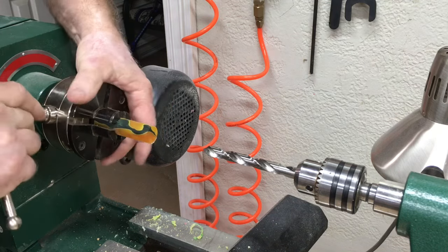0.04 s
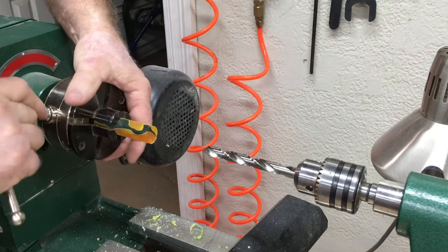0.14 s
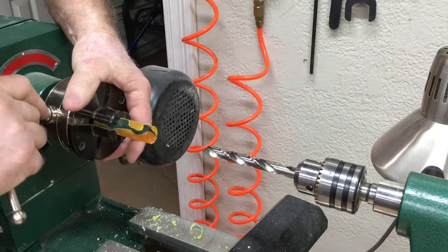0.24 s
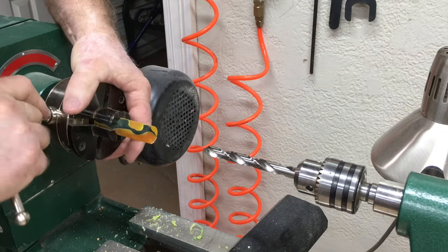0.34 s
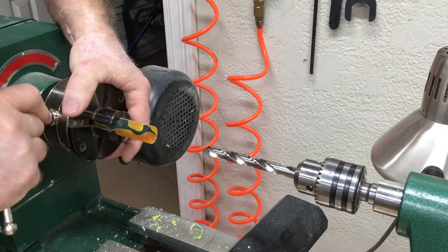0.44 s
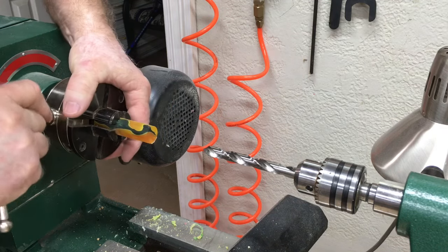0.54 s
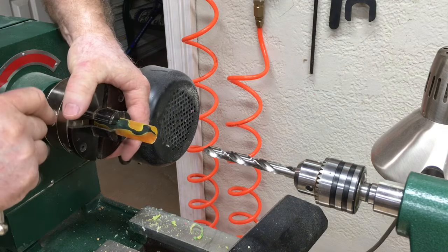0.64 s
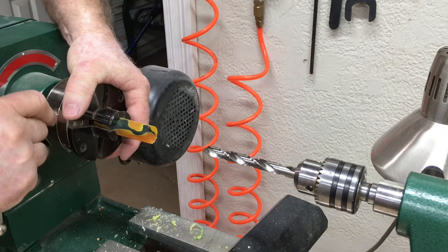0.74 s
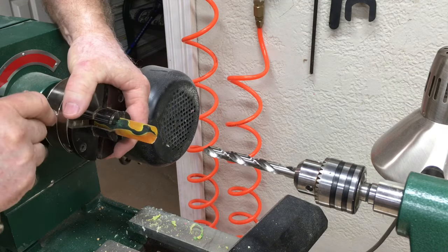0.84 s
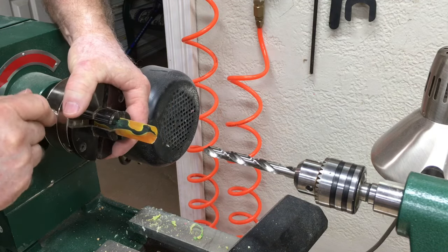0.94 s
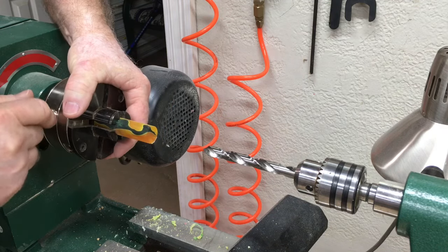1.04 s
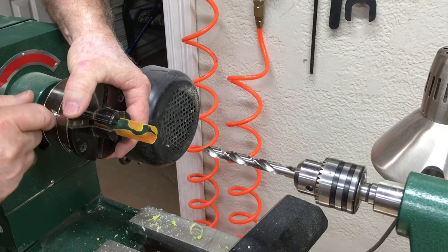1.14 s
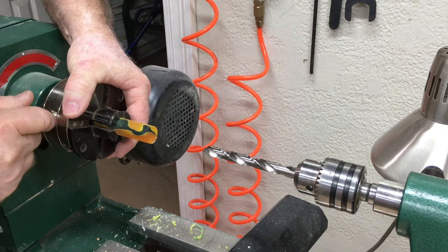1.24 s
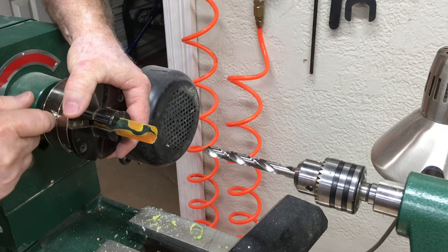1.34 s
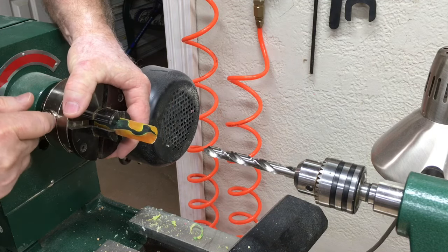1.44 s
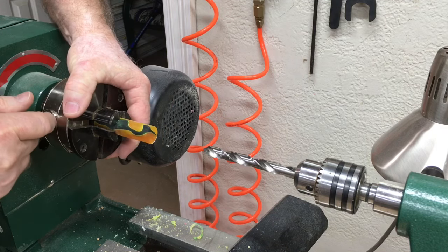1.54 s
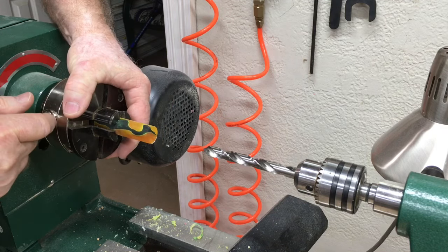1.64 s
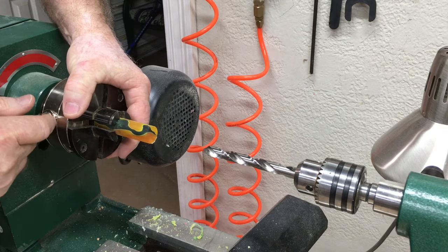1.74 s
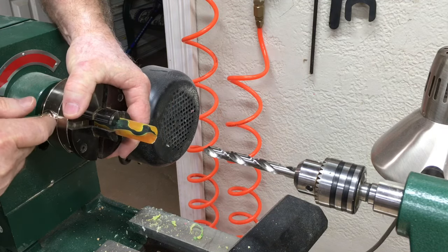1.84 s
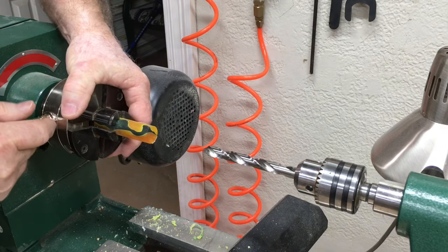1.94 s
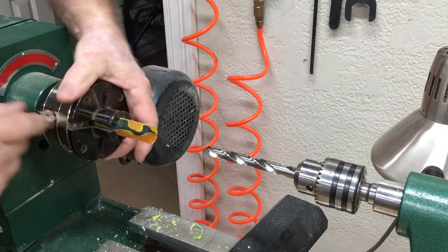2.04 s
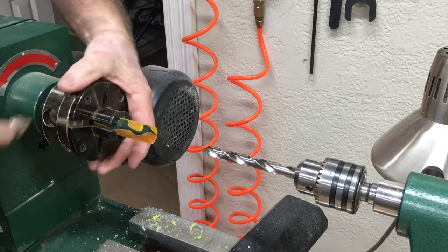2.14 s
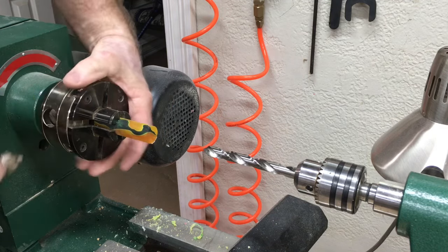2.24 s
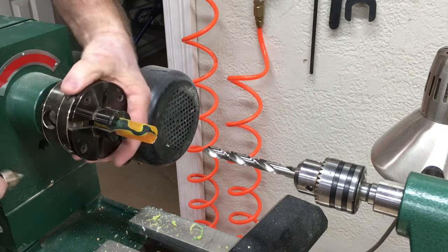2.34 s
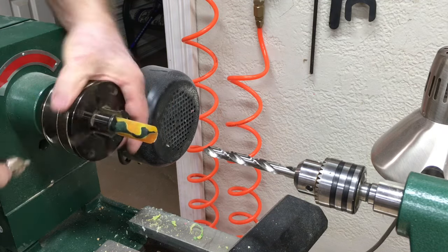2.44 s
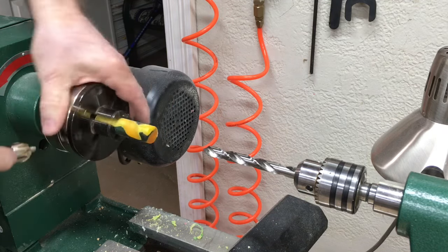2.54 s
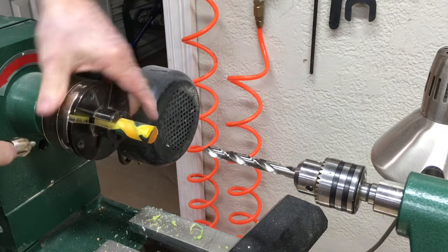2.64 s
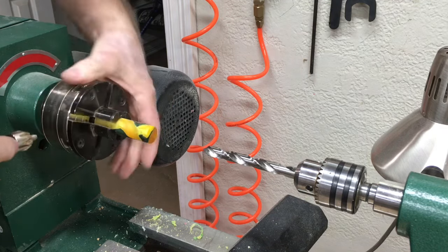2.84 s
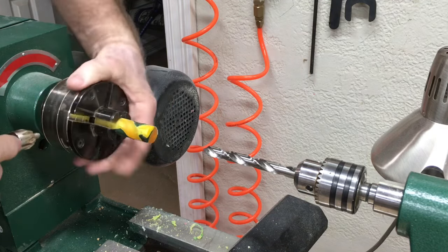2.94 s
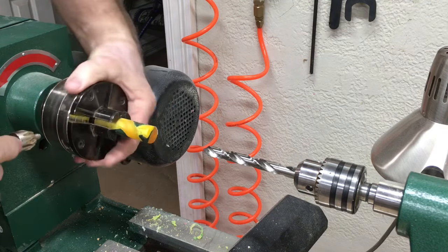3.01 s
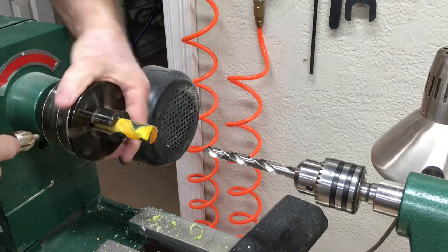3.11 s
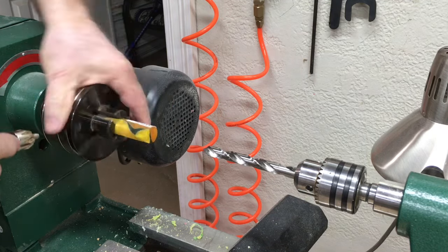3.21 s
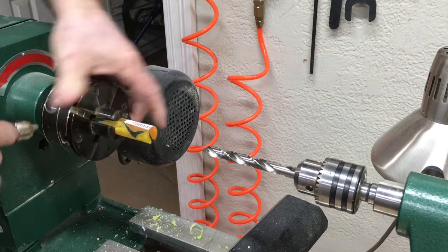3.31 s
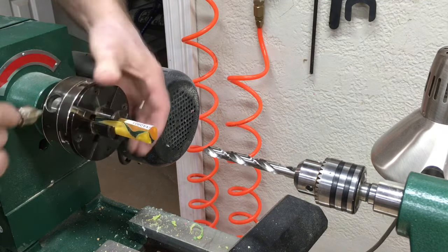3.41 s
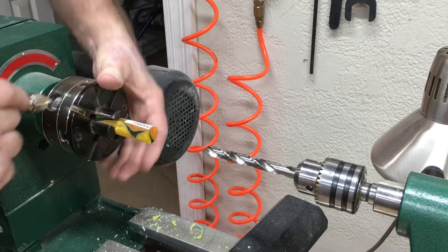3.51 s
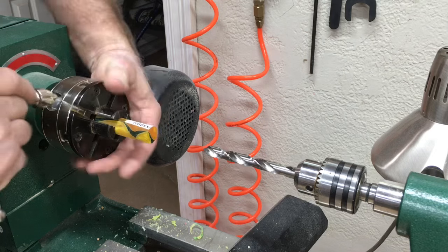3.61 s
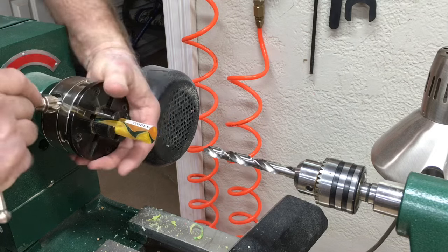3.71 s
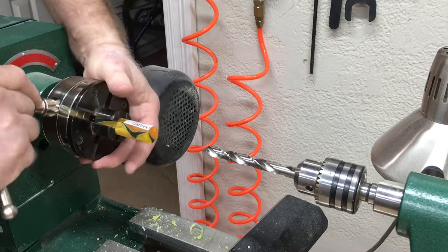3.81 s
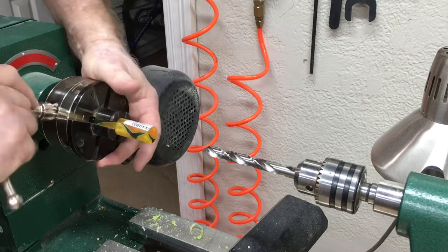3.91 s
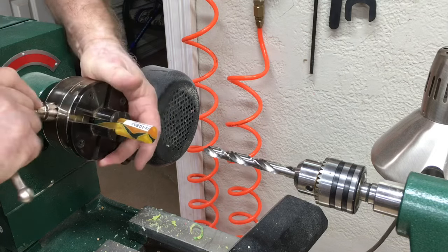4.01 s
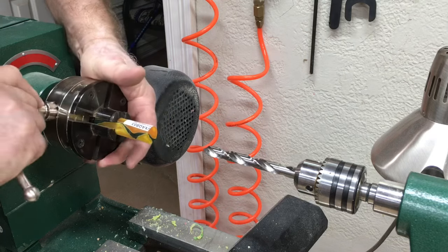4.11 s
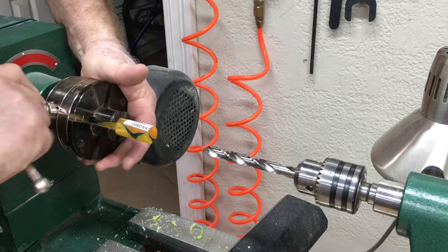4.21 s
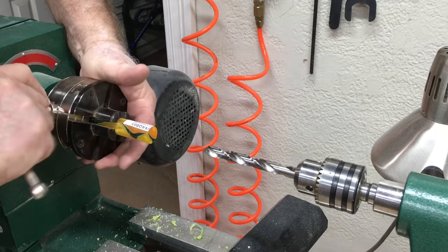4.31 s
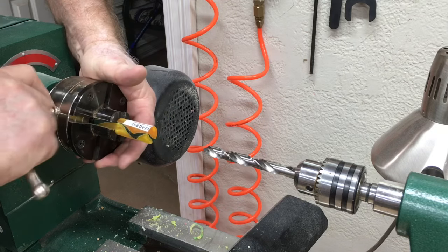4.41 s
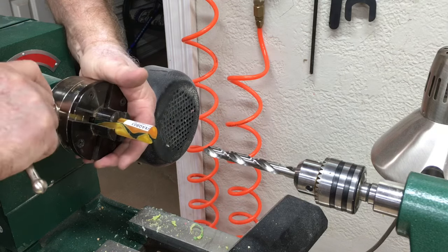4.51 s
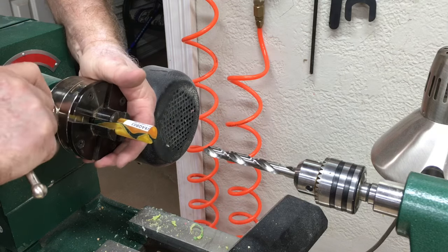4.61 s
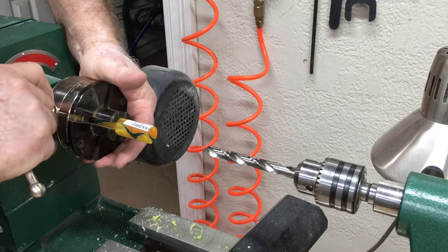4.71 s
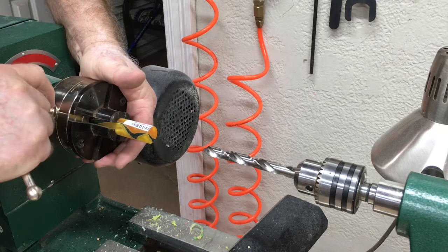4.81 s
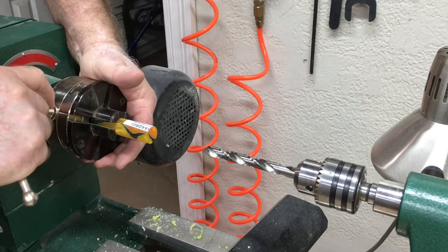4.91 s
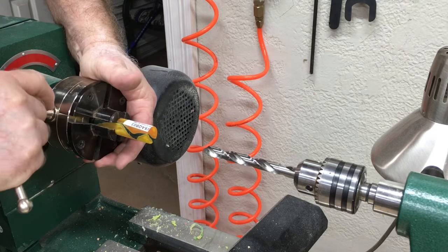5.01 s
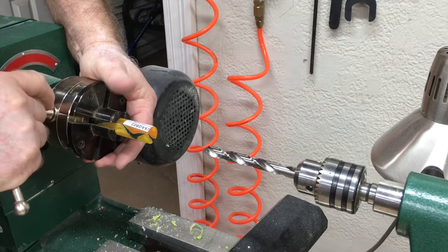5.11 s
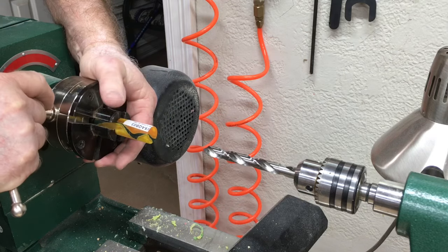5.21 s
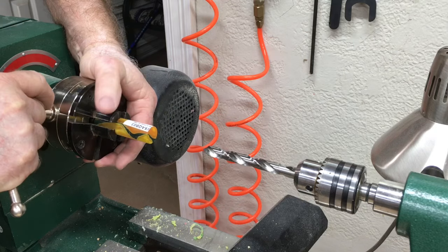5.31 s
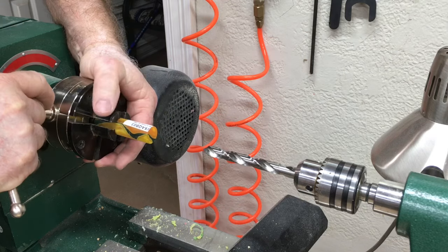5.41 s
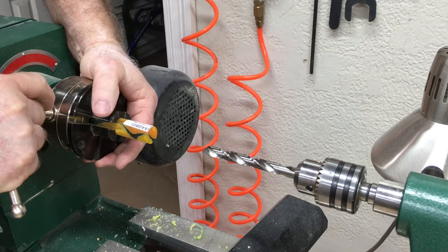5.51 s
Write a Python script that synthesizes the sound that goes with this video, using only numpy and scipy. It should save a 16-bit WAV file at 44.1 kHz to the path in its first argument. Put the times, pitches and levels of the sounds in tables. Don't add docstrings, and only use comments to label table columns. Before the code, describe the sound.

Close view of a hand-turned lathe chuck in a small quiet workshop. Hard steel knocks come first, then near-silence, a dense ratchety rattle at two seconds, hand rustles and bright key clinks, a single clack, a second softer chatter and a final hard knock. Faint motor hum, low rumble and microphone hiss lie underneath.

```python
import sys
import numpy as np
from scipy import signal
from scipy.fft import rfft, irfft
from scipy.io import wavfile
from scipy.ndimage import uniform_filter1d

SR = 44100
rng = np.random.default_rng(int(sys.argv[2]) if len(sys.argv) > 2 else 0)


def voltage_ratio(decibels):
    exponent = np.asarray(decibels, float) / 20
    return 10 ** exponent


def waveform_to_disk(signal):
    frames = np.transpose(np.atleast_2d(signal))
    scaled = np.clip(frames, -1, 1) * 32767
    samples = np.round(scaled).astype(np.int16)
    wavfile.write(sys.argv[1], SR, samples)


N = 244755
LEAD = 4410

# frequency in Hz, width in Hz, level in dB.
HEADSTOCK = [(162.6, 25, -10), (186, 16, -1.5), (248, 90, -5.5), (288.3, 14, -6), (350, 44, -1.5),
             (435, 35, -5.5), (495, 130, -5), (555, 34, -6.5), (642.9, 23, 0), (771.5, 130, -3),
             (830, 210, -2.5)]


def at_hz(points, hz, column=1):
    points = np.array(points)
    return np.interp(np.log(hz + 1), np.log(points[:, 0]), points[:, column])


def coloured(spectrum):
    gain = voltage_ratio(at_hz(spectrum, np.fft.rfftfreq(N, 1 / SR)))
    x = irfft(rfft(rng.standard_normal(N)) * gain, N)
    return x / x.std()


def band(x, low_hz, high_hz):
    return signal.sosfilt(signal.butter(2, [low_hz, high_hz], "band", fs=SR, output="sos"), x)


def ring(force, hz, t60):
    radius, angle = voltage_ratio(-60 / (t60 * SR)), 2 * np.pi * hz / SR
    poles = [1, -2 * radius * np.cos(angle), radius * radius]
    return signal.lfilter([0, np.sin(angle)], poles, force + 1e-18)


def resonances(force, peaks):
    out = 0
    for k, (hz, width_hz, peak_db) in enumerate(peaks):
        t60 = np.log(1000) / (np.pi * width_hz)
        level = (-1) ** k * voltage_ratio(peak_db) * np.sqrt(4 * np.pi * width_hz / SR)
        out = out + level * ring(force, hz, t60)
    return out


def struck(modes, hits):
    s, *levels_db = np.transpose(hits)
    out = 0
    for (hz, t60), level_db in zip(modes, levels_db):
        force = np.zeros(N + LEAD)
        force[(s * SR).astype(int) + LEAD] = voltage_ratio(level_db)
        out = out + ring(force, hz, t60)
    return out


def bursts(times, levels_db, late_s, rise_s, t60):
    marks = np.zeros(N + LEAD)
    np.add.at(marks, ((times + late_s) * SR).astype(int) + LEAD, voltage_ratio(levels_db))
    up, down = np.exp(-1 / (max(rise_s, 1e-4) * SR)), voltage_ratio(-60 / (t60 * SR))
    return signal.lfilter([1 - up], np.convolve([1, -up], [1, -down]), marks + 1e-18)


def swells(rows, column=3):
    t = np.arange(N) / SR
    edge_db = -21
    shape = []
    for peak_s, rise_s, fall_s, *_ in rows:
        corners_s = [peak_s - abs(rise_s), peak_s, peak_s + abs(fall_s)]
        shape.append(np.interp(t, corners_s, [edge_db, 0, edge_db], -99, -99))
    return np.array(shape) + np.array(rows)[:, [column]]


def grit(level_db, per_s, spread_db):
    strength = voltage_ratio(spread_db * np.minimum(rng.exponential(1, N), 4))
    slips = (rng.random(N) < per_s / SR) * strength
    slips = signal.lfilter([1], [1, -.975], slips)
    return voltage_ratio(level_db) * slips / np.sqrt(np.mean(slips ** 2))


def rumble_and_hiss():
    # frequency in Hz, density in dB per Hz.
    spectrum = [(12, -47.5), (20, -31), (60, 1), (102, -14), (117, -10.5), (139, -11), (169, -23.5),
                (206, -14.5), (273, -20), (342, -23.5), (506, -33), (599, -25), (1600, -37), (15200, -41),
                (16500, -53.5)]
    return voltage_ratio(-61) * coloured(spectrum)


def hum():
    # time in seconds, level in dB.
    line = [(0.0, -58.5), (0.6, -60), (1.33, -59.5), (2.29, -59.5), (2.83, -68), (3.1, -64), (4.101, -77),
            (4.55, -59.5), (4.75, -73), (5.55, -77)]
    wander_hz = uniform_filter1d(rng.standard_normal(N), size=6000) * 60
    phase = 2 * np.pi * np.cumsum(138 + wander_hz) / SR
    level_db = np.interp(np.arange(N) / SR, *np.transpose(line))
    return np.sqrt(2) * voltage_ratio(level_db) * np.sin(phase)


def workshop(x):
    # frequency in Hz, t60 in seconds, level in dB.
    room = [(100, 0.93, -11), (300, 0.41, -0.5), (1070, 0.3, -6.5), (2970, 0.22, -12.5), (8000, 0.19, -16),
            (15000, .18, -16.5)]
    far_walls_db = 21.5
    t, tail = np.arange(SR) / SR, 0
    for hz in 90 * 2. ** np.arange(0, 7.6, .5):
        noise = band(rng.standard_normal(len(t)), hz / 1.19, hz * 1.19)
        t60 = at_hz(room, hz)
        fall = voltage_ratio(-60 * t / t60) + voltage_ratio(-far_walls_db - 60 * t / (3 * t60))
        level = voltage_ratio(at_hz(room, hz, column=2)) / np.sqrt(t60 * SR / 14)
        tail = tail + noise * fall * level
    tail = tail * np.clip(t / .015, 0, 1)
    return signal.fftconvolve(x, tail)[:len(x)]


def cover():
    # peak in seconds, rise in seconds, fall in seconds, level in dB.
    buzz = [
        (.72, 0.041, 0.94, -68),
        (2.2, .03, 0.58, -75),
        (4.6, .03, .7, -77),
    ]
    # frequency in Hz, width in Hz, level in dB.
    sheet = [(553, 66, -0.5), (1145, 120, -1), (2130, 120, -6), (5550, 1400, -7.5)]
    throb = 0.27 + np.sin(np.pi * 7.6 * np.arange(N) / SR + .8) ** 4
    force = voltage_ratio(swells(buzz).max(axis=0)) * throb * rng.standard_normal(N)
    return resonances(force, sheet)


def stand():
    # frequency in Hz, t60 in seconds.
    modes = [(112, 1.3), (339, 1.6), (535, 1.1)]
    # time in seconds, then the level in dB given to each of the three modes.
    hits = [
        (0.152, -54, -56.5, -64),
        (0.579, -48, -55, -52),
        (2.1, -52, -54, -60.5),
        (3.702, -60.5, -59, -58.5),
        (4.018, -55.5, -60, -52),
        (4.439, -46.5, -51, -55.5),
    ]
    return band(struck(modes, hits), 53, 700)


def hands():
    # peak in seconds, rise in seconds, fall in seconds, level in dB.
    shifts = [(2.415, 0.24, .06, -57.5), (2.565, .25, 0.11, -56), (3.2, 0.085, 0.18, -52),
              (4.25, 0.18, .2, -52.5), (4.37, 0.11, 0.0044, -43.5)]
    level = uniform_filter1d(voltage_ratio(swells(shifts).max(axis=0) - 5.5), size=500)
    force = level * rng.standard_normal(N)
    return band(resonances(np.pad(force, (LEAD, 0)), HEADSTOCK), 170, 520)


def palm():
    # peak in seconds, rise in seconds, fall in seconds, hiss level in dB, tilt in dB.
    strokes = [(0.185, 0.032, 0.043, -55, 14.5), (2.012, 0.047, 0.0089, -60, 9.5),
               (2.286, 0.22, 0.038, -68, 8.5), (2.501, .4, 0.11, -72, 10.5), (2.625, 0.12, 0.039, -53.5, 3),
               (2.813, 0.015, 0.026, -56, -15.5), (2.916, .16, 0.078, -60, 4), (3.08, 0.32, 0.38, -70, 10),
               (3.262, 0.15, 0.049, -58.5, 5), (3.447, 0.042, .035, -45, 0.5),
               (4.468, .03, 0.049, -45.5, 16)]
    # frequency in Hz, density in dB per Hz.
    colour = [(1470, -33), (2500, -9), (2990, -10), (3380, -12), (4840, -12.5), (5920, -8), (10600, -4.5),
              (13600, 1), (16000, -6)]
    hiss = coloured(colour)
    level_db = swells(strokes)
    tilt_db = np.array(strokes)[level_db.argmax(axis=0), -1]
    dull = signal.sosfilt(signal.butter(2, 8000, fs=SR, output="sos"), hiss)
    gain = uniform_filter1d(voltage_ratio(level_db.max(axis=0)), size=900)
    return gain * (hiss - dull + voltage_ratio(tilt_db) * dull)


def gear():
    # peak in seconds, rise in seconds, fall in seconds, chuck level in dB, bright level in dB.
    grind = [(0.151, .002, 0.083, -43.5, -43.5), (2.06, 0.048, 0.069, -29, -39.5),
             (2.1, 0.081, 0.04, -25, -40), (3.97, 0.034, 0.09, -29, -51.5),
             (4.011, 0.057, 0.047, -31.5, -29.5), (4.26, .015, .15, -56.5, -66),
             (4.374, 0.031, 0.0018, -44, -43.5), (4.452, 0.0038, .09, -40.5, -43.5)]
    # frequency in Hz, width in Hz, level in dB.
    scroll = [(1254, 72, -2.5), (1470, 120, -7), (1700, 98, -1), (1760, 85, -3), (1850, 120, -7.5),
              (2030, 57, -6.5)]
    # frequency in Hz, width in Hz, level in dB.
    teeth = [(3320, 500, -5), (4100, 400, -2.5), (4720, 180, 0), (6100, 540, -6.5), (10900, 800, -16.5)]
    tick_db = swells(grind, column=4).max(axis=0) - 6
    ticks = grit(tick_db, per_s=230, spread_db=4.0) * rng.standard_normal(N)
    rasp_db = swells(grind).max(axis=0) - 6
    rasp = grit(rasp_db, per_s=700, spread_db=2.5) * rng.standard_normal(N)
    both = band(resonances(ticks, teeth), 2500, 7800) + band(resonances(rasp, scroll), 1050, 2400)
    return np.pad(both, (LEAD, 0))


def jaws():
    # frequency in Hz, t60 in seconds, level in dB.
    modes = [(1737, 0.03, -6), (3320, 0.17, -13.5), (4840, 0.0245, 2.5), (6440, 0.03, -8.5),
             (10560, 0.085, -13.5)]
    # time in seconds, level in dB, tilt in dB per octave.
    hits = [(0.1438, -42.5, 5), (2.02, -29.5, 4), (2.055, -35, 1.1), (2.0637, -25.5, 3.5),
            (2.0889, -25, 0.8), (3.6939, -33.5, 1.4), (3.9909, -31, -8.5), (4.0035, -28.5, -3.5),
            (4.0122, -30.5, 1.2), (4.3775, -35.5, -3.5), (4.469, -45, 4)]
    hz, t60, mode_db = np.transpose(modes)
    octaves = np.log2(hz / hz[2])
    blows = [(s, *mode_db + level_db + tilt_db * octaves) for s, level_db, tilt_db in hits]
    return struck(zip(hz, t60), blows)


def key():
    # frequency in Hz, t60 in seconds, level in dB struck at the tip, level in dB struck on the shank.
    modes = [(594, 0.23, -62.5, -67), (1448, 0.43, -58, -80.5), (2137, 0.28, -60, -58.5),
             (2410, 0.23, -65, -61), (2870, .07, -77, -48), (3047, 0.35, -63, -52.5),
             (5460, 0.19, -70, -58), (5850, 0.19, -87, -58.5), (6315, .15, -80, -64),
             (6850, .07, -50.5, -70), (7400, .09, -52.5, -64.5), (7560, .1, -53.5, -54.5),
             (11550, 0.068, -53, -55), (12400, .07, -60, -55)]
    # time in seconds, tip level in dB, shank level in dB, tilt in dB per octave.
    hits = [
        (2.551, -30, -1.5, -5),
        (2.811, 0, -22, 0.8),
        (3.422, 0.7, -13, -0.7),
        (3.441, -12.5, -2.6, 4.3),
        (3.6944, -6.5, -15, -1),
    ]
    hz, t60, tip_db, shank_db = np.transpose(modes)
    octaves = np.log2(hz / hz[5])
    blows = []
    for s, tip_hit_db, shank_hit_db, tilt_db in hits:
        height = voltage_ratio(tip_db + tip_hit_db) + voltage_ratio(shank_db + shank_hit_db)
        blows.append((s, *20 * np.log10(height) + tilt_db * octaves))
    return struck(zip(hz, t60), blows)


def contacts():
    # time in seconds, crack level in dB, chuck level in dB, headstock level in dB.
    firm = [(0.142, -23, -31.5, -30.5), (0.4566, -24.5, -25.5, -33.5), (0.468, -34, -42, -33),
            (0.5672, -29, -33.5, -40), (0.5707, -13, -22.5, -21), (2.552, -38.5, -33.5, -42),
            (3.6948, -27, -24.5, -26.5), (3.701, -42.5, -31.5, -44.5), (4.3771, -21.5, -20.5, -31),
            (4.393, -56.5, -31, -42.5), (4.4263, -22, -29, -39.5), (4.428, -13.5, -21, -23)]
    earlier = [
        (-.025, -23.5, -26.5, -30.5),
    ]
    rattle = [(2.019, -34.5, -35.5, -49.5), (2.023, -27.5, -32.5, -45.5), (2.048, -37, -41, -42),
              (2.056, -29, -41.5, -39), (2.0634, -23.5, -27, -40.5), (2.0878, -12, -26, -33.5),
              (2.095, -33, -35, -33.5), (3.9404, -55, -44, -42.5), (3.957, -45, -33.5, -40),
              (3.9645, -36.5, -36, -33.5), (3.968, -45.5, -34, -47.5), (3.9801, -25.5, -26.5, -46.5),
              (3.987, -33, -31.5, -47), (3.993, -33, -29.5, -32.5), (4.006, -22, -21, -60),
              (4.011, -24, -44, -32.5), (4.018, -46, -36.5, -33.5), (4.025, -39.5, -32.5, -42.5)]
    ticks = [(0.121, -51.5, -60, -43), (0.129, -48, -52, -38), (0.3777, -59.5, -70.5, -75),
             (0.3842, -88, -57, -47), (0.433, -53.5, -56.5, -52), (0.445, -50.5, -42.5, -45),
             (2.351, -60.5, -69, -81), (2.418, -79, -73, -56), (2.468, -56.5, -63, -63),
             (2.7254, -61.5, -65, -61), (3.025, -60, -62, -55.5), (3.19, -81, -57, -55.5),
             (3.687, -69, -67.5, -59.5), (3.8816, -66.5, -57, -47.5), (4.2759, -64, -52, -42),
             (4.343, -66.5, -53, -47), (4.356, -54, -53, -41.5), (4.911, -80, -70, -79),
             (5.53, -95, -63, -68)]
    clinks = [(1.988, -56, -67, -64), (2.813, -52, -48.5, -47.5), (3.4195, -53, -49.5, -48.5),
              (3.443, -55, -48.5, -53)]
    # crack part near 3 kHz in dB, part near 12 kHz in dB.
    colours = [
        (-0.1, -14),
        (-6, -18),
        (-2.5, -9),
        (-1, 0.5),
    ]
    kinds = earlier + firm, rattle, ticks, clinks
    rows = [row + colour for kind, colour in zip(kinds, colours) for row in kind]
    s, crack_db, chuck_db, low_db, dull_db, bright_db = np.transpose(rows)
    hard_db = crack_db - chuck_db
    dull_crack_db = crack_db + dull_db - 0.63 * hard_db
    bright_crack_db = crack_db + bright_db + 0.33 * hard_db
    return s, dull_crack_db, crack_db, bright_crack_db, chuck_db, low_db


def knocks():
    # frequency in Hz, width in Hz, level in dB.
    crack_groups = [
        [(2520, 1200, 0), (3515, 760, 1.5)],
        [(4190, 710, -3.5), (4850, 840, 0), (5470, 770, -2), (6200, 670, -1.5), (6990, 2000, -3.5)],
        [(9200, 1200, 0), (11420, 290, -4), (11996, 2300, -5), (14900, 1400, -12.5)],
    ]
    # frequency in Hz, width in Hz, level in dB.
    chuck_peaks = [(975, 27, -13.5), (1171, 100, -2.5), (1226, 70, -1.5), (1392, 350, -6), (1600, 100, -2),
                   (1677, 160, -3), (1789, 50, -2), (1823, 280, -4.5), (2084, 44, -5.5), (2300, 140, -11)]
    s, *crack_db, chuck_db, low_db = contacts()
    noise, crack = rng.standard_normal((5, N + LEAD)), 0
    for peaks, level_db, white in zip(crack_groups, crack_db, noise):
        snap = bursts(s, level_db - 1, late_s=-.0005, rise_s=.0004, t60=.012)
        shake = bursts(s, level_db - 15.0, late_s=0.00091, rise_s=0.0019, t60=.07)
        edges = .7 * peaks[0][0], 1.2 * peaks[-1][0]
        part = resonances((snap + shake) * white, peaks)
        crack = crack + band(band(part, *edges), *edges)
    blow = bursts(s, chuck_db + 3, late_s=-.0005, rise_s=.0004, t60=.012)
    body = blow + bursts(s, chuck_db - 9, late_s=0, rise_s=0.0025, t60=0.1)
    chuck = band(resonances(body * noise[3], chuck_peaks), 1100, 2600)
    thud = bursts(s, low_db - 5, late_s=.001, rise_s=0.0071, t60=0.078)
    headstock = band(resonances(thud * noise[4], HEADSTOCK), 160, 1000)
    return crack + chuck + headstock


def scene():
    metal = knocks() + gear() + key() + jaws() + stand() + hands()
    near = (metal + workshop(metal))[LEAD:] + palm() + cover()
    return (near + hum() + rumble_and_hiss())[None]


def roll_off(x):
    return signal.sosfilt(signal.butter(12, 16990, fs=SR, output="sos"), x)


def record(dry):
    # frequency in Hz, width in Hz, level in dB.
    housing = [(4960, 430, -4.5), (10500, 700, -1), (13000, 1400, 2.5)]
    hz = np.fft.rfftfreq(N, 1 / SR)
    colour_db = sum(depth_db * np.exp(-((hz - centre_hz) / width_hz) ** 2)
                    for centre_hz, width_hz, depth_db in housing)
    colour_db -= np.maximum(hz - 16100, 0) / 25
    return roll_off(irfft(rfft(dry) * voltage_ratio(colour_db), N))


dry = scene()
out = record(dry)
waveform_to_disk(out)
```